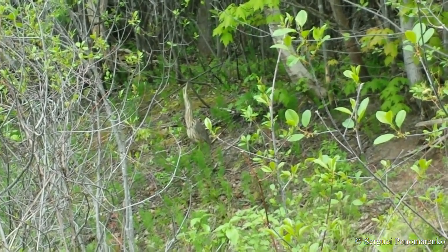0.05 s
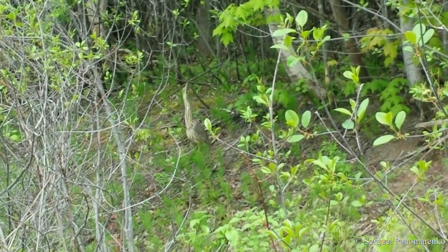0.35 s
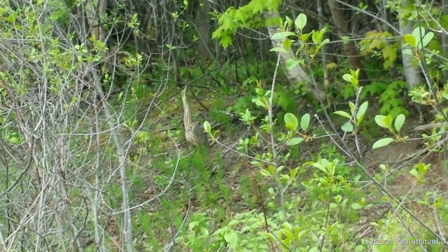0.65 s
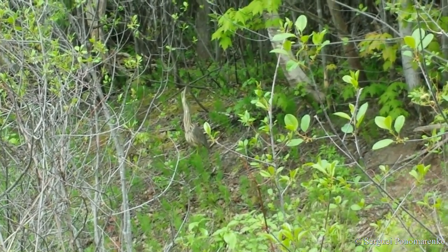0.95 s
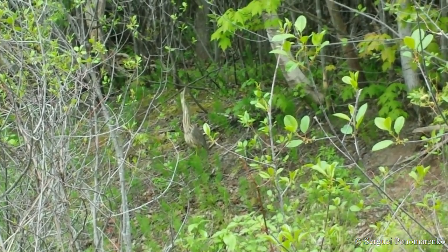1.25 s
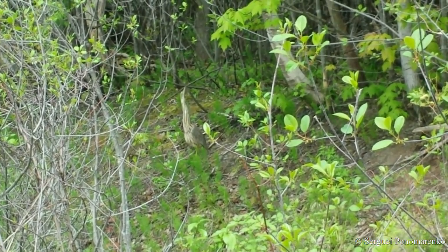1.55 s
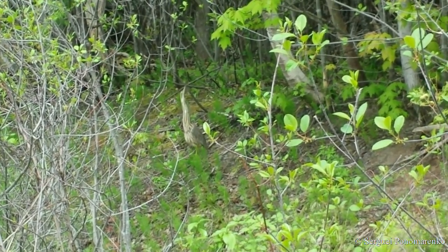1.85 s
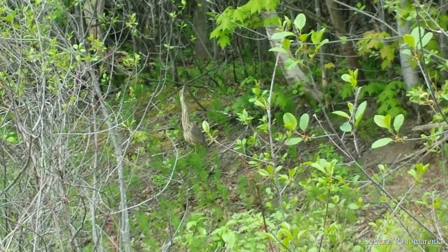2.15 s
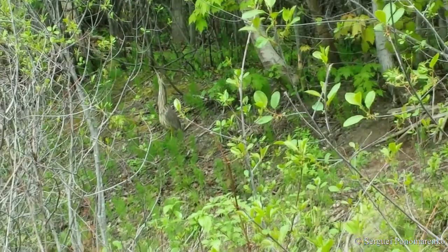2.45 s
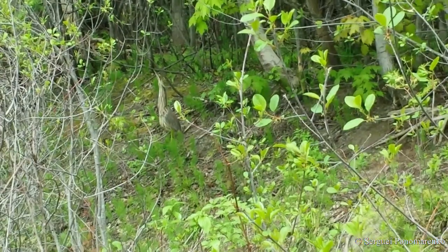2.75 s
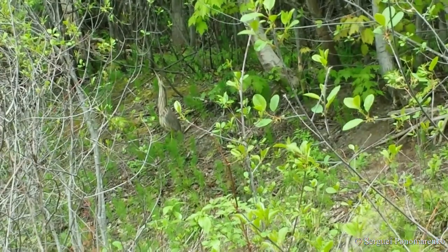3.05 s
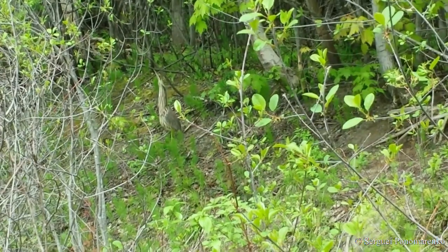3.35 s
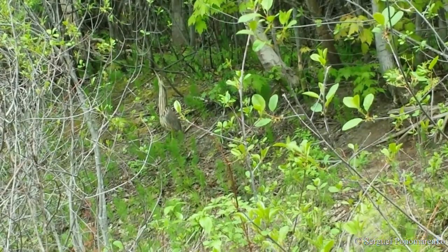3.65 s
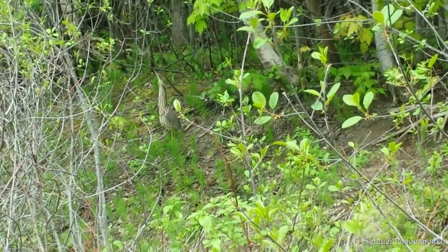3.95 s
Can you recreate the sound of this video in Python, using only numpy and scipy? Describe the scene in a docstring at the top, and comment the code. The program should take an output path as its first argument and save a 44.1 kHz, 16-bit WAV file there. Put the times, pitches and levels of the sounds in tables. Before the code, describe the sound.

A bird gives one rising chirp at a woodland edge, over low wind rumble, a far engine drone and microphone hiss. The sound briefly cuts out, then fades back in as a distant bird whistles two thin notes.

```python
"""One long chirp glides upward at a woodland edge, amid faint twitter and a soft rustle.
Later a far bird whistles two thin, falling notes; the trees give every call a short, diffuse echo.
The bed is low wind rumble, the drone of a far engine and steady microphone hiss with a faint whine.
The right microphone pops a few times at the start. After the chirp the whole mix cuts out,
then fades back in, bass first, as the whistle begins."""
import sys
import numpy as np
from scipy import signal
from scipy.fft import rfft, irfft, next_fast_len
from scipy.io import wavfile
from scipy.ndimage import uniform_filter1d, map_coordinates

SR = 44100
rng = np.random.default_rng(int(sys.argv[2]) if len(sys.argv) > 2 else 0)


def pcm_store(signal):
    """Save signal as 16-bit PCM."""
    levels = np.round(np.clip(np.atleast_2d(signal), -1, 1) * 32767)
    wavfile.write(sys.argv[1], SR, levels.astype(np.int16).T)


N = 176400

# colour of each microphone's hiss (frequency [Hz], relative level [dB])
HISS_LEFT_EQ = [(500, -4), (2500, -4.5), (3200, -0.5), (4200, -1.5), (6200, -0.5), (7800, -4), (12600, -5),
                (15500, -7)]
HISS_RIGHT_EQ = [(500, -8), (2500, -6.5), (4200, -5), (5700, -2.5), (6300, 0), (6700, -2), (7250, 1),
                 (7900, -4), (9500, -3.5), (12600, -4.5), (13000, -8), (15500, -10)]
# lines of the whine (frequency [Hz], level [dB])
WHINE_LINES = [(6257, -81), (7271, -76.5), (12577, -79)]
# the engine's hum (order [x fundamental], level [dB])
ENGINE_ORDERS = [(1, -50), (2, -60), (3, -59)]
# colour of the wind's rumble and the open air's murmur (frequency [Hz], relative level [dB])
RUMBLE_EQ = [(15, -23), (30, -14), (40, -8.5), (55, 0), (90, 0), (130, -3), (155, -7.5), (220, -8.5),
             (275, -16), (320, -10.5), (400, -16), (700, -48)]
MURMUR_EQ = [(60, -8.5), (250, -11), (430, -8.5), (500, 1.5), (575, 0), (650, -3.5), (850, -7), (1100, -7),
             (1230, -11.5), (1700, -16), (2300, -20), (3000, -27), (5000, -42.5), (12000, -66.5)]
# their stereo image (frequency [Hz], left-right correlation [-1..1])
RUMBLE_IMAGE = [(60, 1), (320, 0.87)]
MURMUR_IMAGE = [(150, .85), (550, 0.61), (850, 0.23), (1400, -0.12), (2500, -0.44)]
# the murmur's lean to the left (frequency [Hz], left boost [dB])
MURMUR_LEAN = [(500, 0), (1100, .5), (1700, 2), (2600, 0)]
# strength of the wind (time [s], gain [dB])
WIND_SWELL = [(0, 0.6), (1.0, -0.3), (1.4, 1.2), (2.4, 0.5), (3.05, 1.2), (3.4, -0.3), (4, -1.3)]
# pops in the right microphone (time [s], step level [dB])
POP_HITS = [(0.0271, -11), (.3363, -13.3), (0.3384, -5.6), (.3394, -12.5), (.3410, -13), (0.3464, -11.3),
            (0.3587, -11)]
# envelope of the rustle (time [s], level [dB])
RUSTLE_ENVELOPE = [(2.08, -80), (2.16, -67), (2.22, -61), (2.29, -63), (2.335, -58), (2.365, -61),
                   (2.40, -58), (2.45, -59.5), (2.6, -85)]
# colour of the rustle (frequency [Hz], relative level [dB])
RUSTLE_EQ = [(1500, -22), (3000, -3.5), (4700, -3.5), (5200, -1), (5800, 1.5), (7200, -5.5), (8500, -16),
             (14000, -24)]
# faint notes around the chirp (time [s], length [s], start pitch [Hz], end pitch [Hz], level [dB])
TWITTER_NOTES = [(2.12, .08, 4450, 4850, -67), (2.22, 0.07, 5700, 5450, -65),
                 (2.33, 0.035, 4650, 4750, -64), (2.372, .07, 5900, 5650, -64),
                 (2.388, .06, 2960, 2960, -66)]
# the far bird's high note, then its low one (time [s], pitch [Hz], level [dB])
HIGH_NOTE = [(2.85, 4240, -84), (2.895, 4180, -70), (2.945, 4160, -78), (2.99, 4140, -74),
             (3.05, 4100, -75), (3.1, 4100, -86)]
LOW_NOTE = [(3.2, 3510, -87), (3.41, 3500, -77.5), (3.68, 3485, -87)]
# the rising chirp (time [s], pitch [Hz], left level [dB], right level [dB], left phase lead [rad])
CHIRP_GLIDE = [(2.12, 2150, -80, -74, 3.1), (2.18, 2380, -68, -64, 3.1), (2.23, 2560, -62, -62, 3.1),
               (2.255, 2680, -60, -63, 2.8), (2.285, 2810, -53, -59, 2), (2.328, 2990, -53, -62, 1.2),
               (2.345, 3000, -68, -66, .2), (2.365, 2950, -80, -78, 0)]


def amp(db):
    """Decibels to gain."""
    return 10 ** (np.asarray(db) / 20)


def unit(x):
    """x at rms 1."""
    return x / np.sqrt(np.mean(x ** 2) + 1e-20)


def along(points, hz):
    """A frequency table read on a log axis."""
    freqs, values = np.transpose(points)
    return np.interp(np.log(hz + 1), np.log(freqs + 1), values)


def curve(rows, column, outside=None):
    """One column of a timed table as a per-sample envelope."""
    rows = np.array(rows)
    return np.interp(np.arange(N) / SR, rows[:, 0], rows[:, column], outside, outside)


def wobble(rate):
    """Smooth random modulation, rate knots a second."""
    knots = rng.standard_normal(int(N * rate / SR) + 4)
    return map_coordinates(knots, [np.arange(N) * rate / SR])


def filtered(x, response):
    """x through a frequency response."""
    size = next_fast_len(N + SR // 2)
    return irfft(rfft(x, size) * response(np.fft.rfftfreq(size, 1 / SR)), size)[..., :N]


def coloured(x, eq):
    """x through an EQ curve, at rms 1."""
    return unit(filtered(x, lambda hz: amp(along(eq, hz))))


def noise_pair(image):
    """Stereo white noise whose left-right correlation follows image."""
    def mid_side_gains(hz):
        angle = np.arccos(np.clip(along(image, hz), -1, 1)) / 2
        return np.array([np.cos(angle), np.sin(angle)])
    mid, side = filtered(rng.standard_normal((2, N)), mid_side_gains)
    return np.array([mid + side, mid - side])


def fuzzy_tone(centre_hz, width_hz):
    """A narrow, pitched band of noise at rms 1."""
    return unit(filtered(rng.standard_normal(N), lambda hz: 1 / (1 + ((hz - centre_hz) / width_hz) ** 2)))


def patchy(x, depth_db):
    """x with small random patches of gain in time and frequency."""
    spectra = signal.stft(x, nperseg=1024)[2]
    patches = uniform_filter1d(rng.standard_normal(spectra.shape[1:]), size=3, axis=0)
    patches = uniform_filter1d(patches, size=6, axis=1)
    return signal.istft(spectra * amp(depth_db * unit(patches)), nperseg=1024)[1][:, :N]


def hiss(left_db=-60.6, right_db=-58.8, waver_db=1.7):
    """Microphone hiss, brighter on the right; it wavers quickly on both sides at once."""
    left, right = patchy(noise_pair([(1000, -0.25)]), depth_db=2.1)
    left = amp(left_db) * coloured(left, HISS_LEFT_EQ)
    right = amp(right_db) * coloured(right, HISS_RIGHT_EQ)
    return np.array([left, right]) * amp(waver_db * wobble(28))


def whine():
    """Faint, fuzzy high lines, panned hard right."""
    lines = sum(amp(db) * fuzzy_tone(hz, width_hz=16) for hz, db in WHINE_LINES)
    return np.array([np.zeros(N), lines])


def engine(fundamental_hz=58.1, drift=0.018, flutter_db=2, drone_db=-59):
    """A far engine: low orders that drift and flutter, with a narrow drone above them."""
    phase = 2 * np.pi * np.cumsum(fundamental_hz * (1 + drift * wobble(6))) / SR
    hum = np.zeros(N)
    for order, db in ENGINE_ORDERS:
        gain = amp(db + flutter_db * wobble(8))
        hum += gain * unit(np.sin(order * phase + rng.uniform(0, 2 * np.pi)))
    return hum + amp(drone_db) * fuzzy_tone(centre_hz=324.7, width_hz=14)


def wind(rumble_db=-45.5, murmur_db=-48.5):
    """Centred rumble and a wider, airy murmur swell together, and each flutters by itself."""
    gust_db = curve(WIND_SWELL, 1) - 0.6 * wobble(2)
    rumble = coloured(noise_pair(RUMBLE_IMAGE), RUMBLE_EQ) * amp(rumble_db + gust_db + 2 * wobble(12))
    air = patchy(noise_pair(MURMUR_IMAGE), depth_db=2.1)
    air[0] = filtered(air[0], lambda hz: amp(along(MURMUR_LEAN, hz)))
    murmur = coloured(air, MURMUR_EQ) * amp(murmur_db + gust_db + wobble(14))
    return rumble + murmur


def pops(rolloff_hz=100, damping=0.46, edge_hz=8000, crackle_db=-36.5, crackle_s=0.0022):
    """Sudden steps swing back through the right microphone's bass roll-off, with a trace of crackle."""
    hits = np.zeros(N)
    for time, db in POP_HITS:
        hits[round(time * SR)] += amp(db)

    def swing(hz):
        s = 1j * hz / rolloff_hz
        highpassed_step = SR / (2 * np.pi * rolloff_hz) * s / (s * s + 2 * damping * s + 1)
        return highpassed_step / (1 + 1j * hz / edge_hz)
    decay = signal.lfilter([1], [1, -np.exp(-1 / (crackle_s * SR))], hits)
    crackle = amp(crackle_db) * decay * rng.standard_normal(N)
    return np.array([np.zeros(N), filtered(hits, swing) + crackle])


def rustle(grain_db=2.2):
    """A soft swell of high, grainy noise around the chirp."""
    scratch = patchy(rng.standard_normal((2, N)), depth_db=3)
    return coloured(scratch, RUSTLE_EQ) * amp(curve(RUSTLE_ENVELOPE, 1, -200) + grain_db * wobble(120))


def trees(x, t60_s=0.43):
    """The wood scatters a call into a diffuse stereo tail; wet signal only."""
    t = np.arange(SR // 2) / SR
    tail = rng.standard_normal((2, len(t))) * amp(-60 * t / t60_s)
    return signal.fftconvolve(x[None], tail / np.linalg.norm(tail[0]), axes=1)[:, :N]


def glide_phase(note, rough):
    """Phase along a note's pitch curve, roughened by fast jitter."""
    hz = curve(note, 1) * (1 + rough * wobble(300))
    return 2 * np.pi * np.cumsum(hz) / SR


def bird_note(note, pan_left_db, rough, echo_db=-2):
    """One whistled sine note, panned and scattered by the trees."""
    tone = np.sqrt(2) * amp(curve(note, 2, -200)) * np.sin(glide_phase(note, rough))
    pan = amp([[pan_left_db / 2], [-pan_left_db / 2]])
    return tone * pan + amp(echo_db) * trees(tone)


def twitter(edge_db=-14):
    """Short blurred glides that swell and fade."""
    notes = np.zeros((2, N))
    for start, length, start_hz, end_hz, db in TWITTER_NOTES:
        note = [(start, start_hz, db + edge_db),
                (start + length / 2, (start_hz + end_hz) / 2, db),
                (start + length, end_hz, db + edge_db)]
        notes += bird_note(note, pan_left_db=0, rough=0.018)
    return notes


def far_bird():
    """Two thin, falling whistles, the second lower and further left."""
    high = bird_note(HIGH_NOTE, pan_left_db=1, rough=0.01)
    return high + bird_note(LOW_NOTE, pan_left_db=6, rough=0.007)


def chirp(echo_db=-11):
    """One long upward glide; it starts wide, in opposite phase on the two sides, and gathers left."""
    phase = glide_phase(CHIRP_GLIDE, rough=0.006)
    left = np.sqrt(2) * amp(curve(CHIRP_GLIDE, 2, -200)) * np.sin(phase)
    right = np.sqrt(2) * amp(curve(CHIRP_GLIDE, 3, -200)) * np.sin(phase - curve(CHIRP_GLIDE, 4))
    return np.array([left, right]) + amp(echo_db) * trees(left)


def scene():
    """The stereo mix: calls, rustle and pops over a steady bed."""
    whistles = far_bird()
    bed = wind() + engine() + hiss() + whine()
    return bed + rustle() + chirp() + whistles + twitter() + pops()


def record(dry, cut_s=2.4475, resume_s=2.756, crossover_hz=110, top_hz=15700, skirt_hz=200):
    """The mix cuts out with a very short tail and fades back in, bass first, under a steep high cut."""
    t = np.arange(N) / SR
    tail = amp(-19 - 900 * np.maximum(t - cut_s, 0))  # drops 19 dB, then 900 dB a second

    def gate(rise_s):
        fade_db = -22.5 * np.clip(1 - (t - resume_s) / rise_s, 0, 1)
        return np.where(t < cut_s, 1, tail + (t > resume_s) * amp(fade_db))
    bass = filtered(dry, lambda hz: 1 / (1 + (hz / crossover_hz) ** 2))
    gated = bass * gate(rise_s=0.19) + (dry - bass) * gate(rise_s=0.23)
    return filtered(gated, lambda hz: np.clip((top_hz - hz) / skirt_hz, 0, 1) ** 2)


dry = scene()
out = record(dry)
pcm_store(out)
```